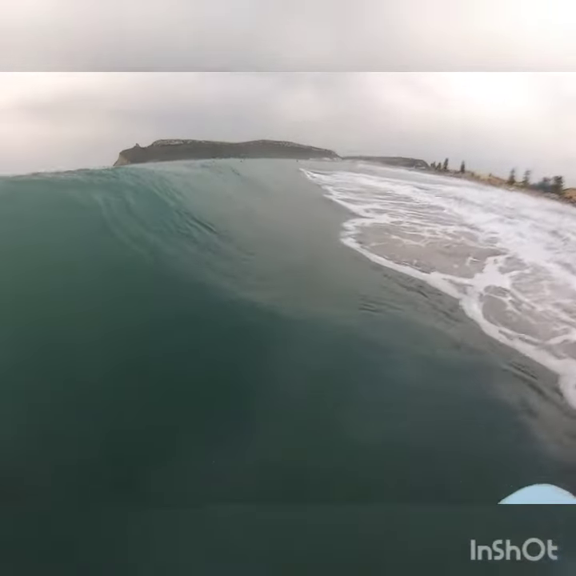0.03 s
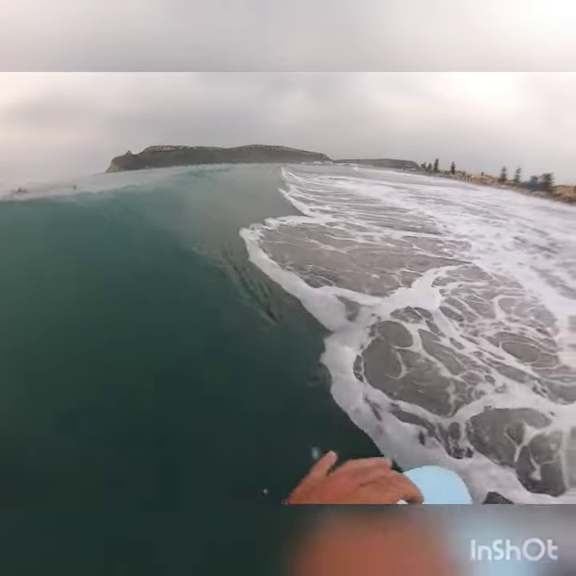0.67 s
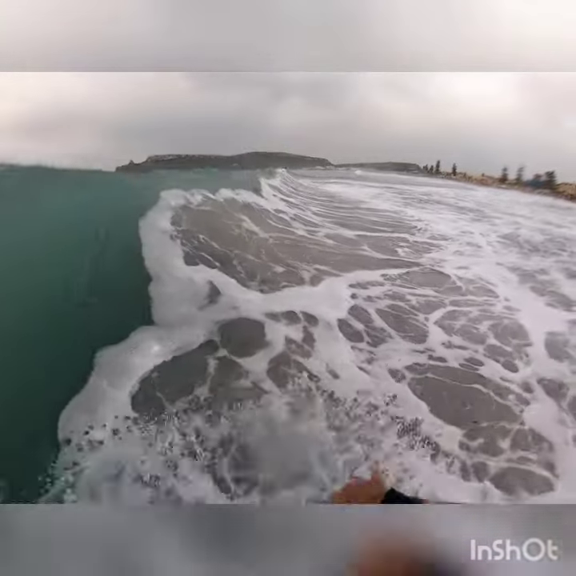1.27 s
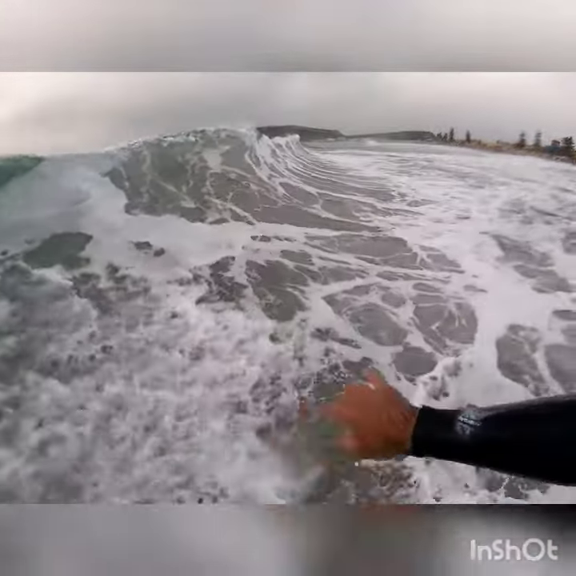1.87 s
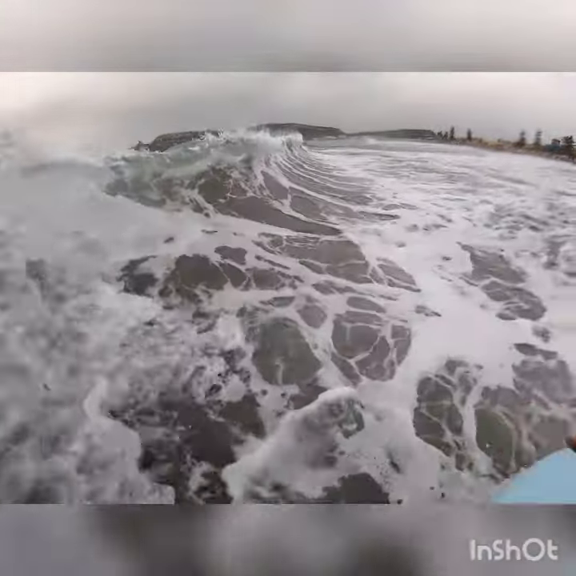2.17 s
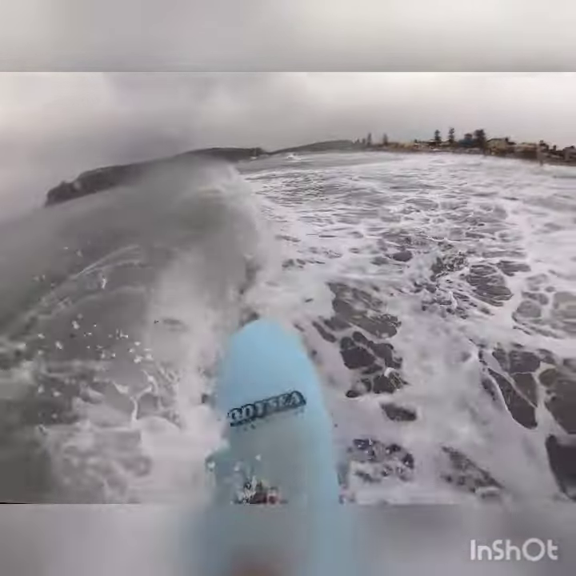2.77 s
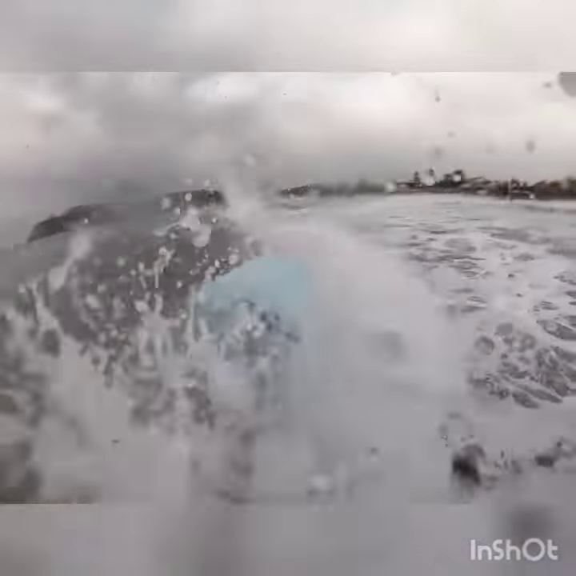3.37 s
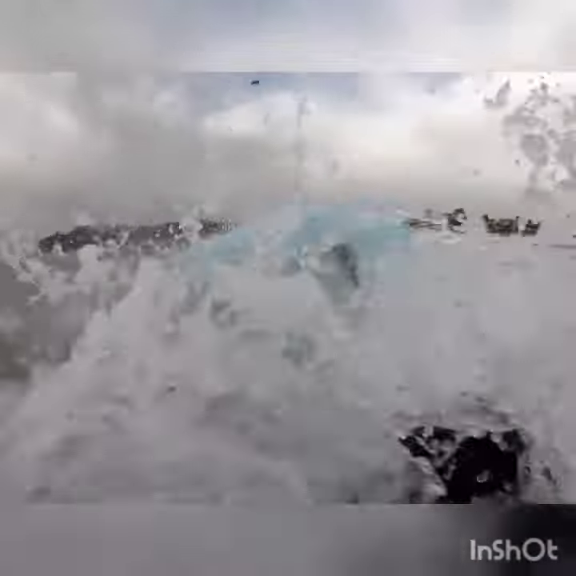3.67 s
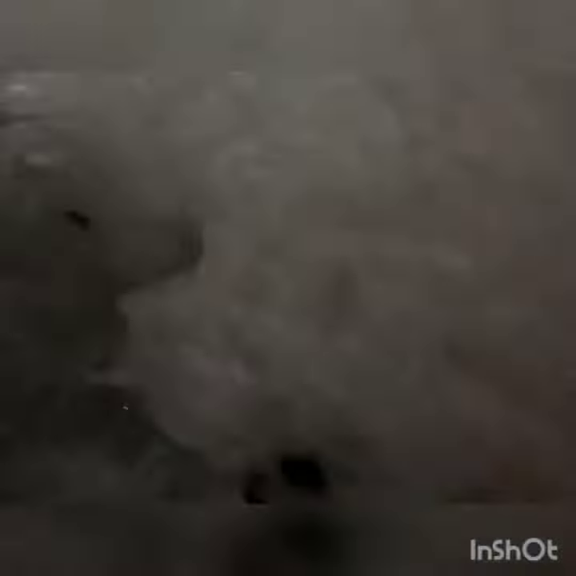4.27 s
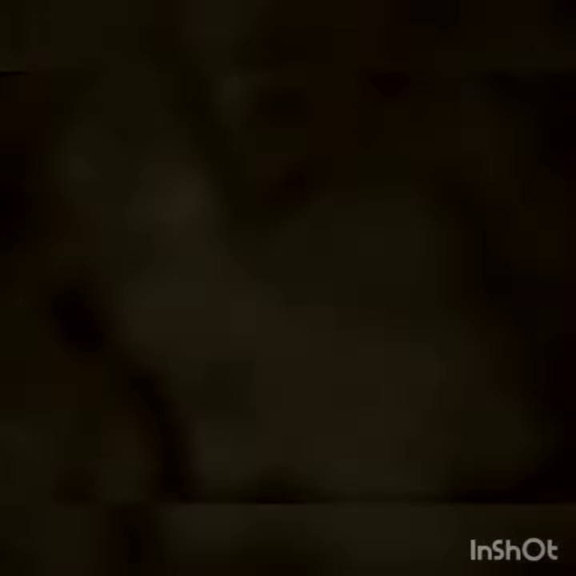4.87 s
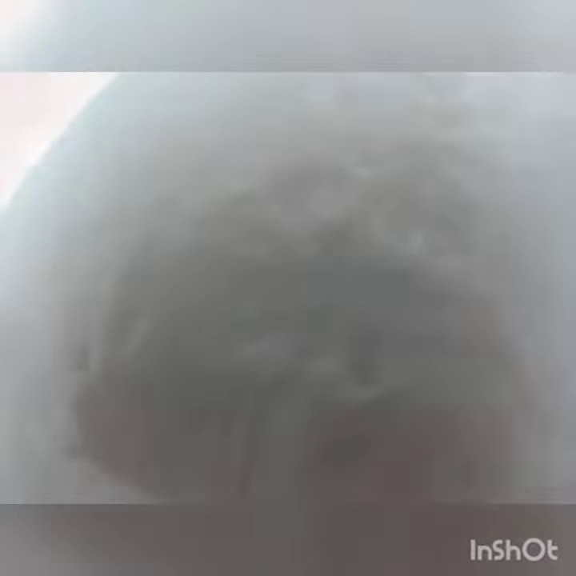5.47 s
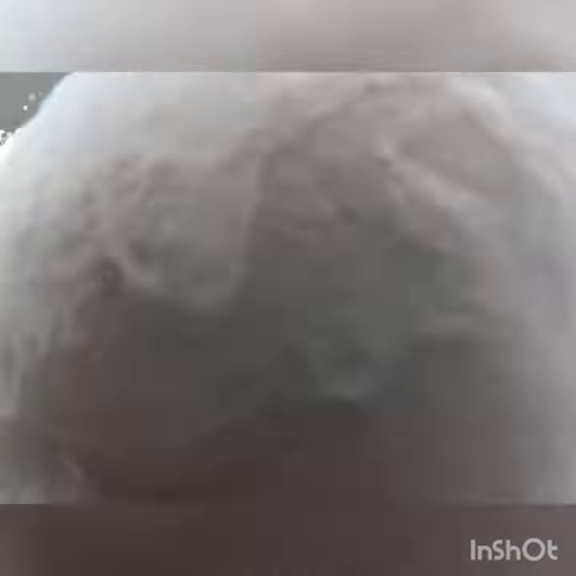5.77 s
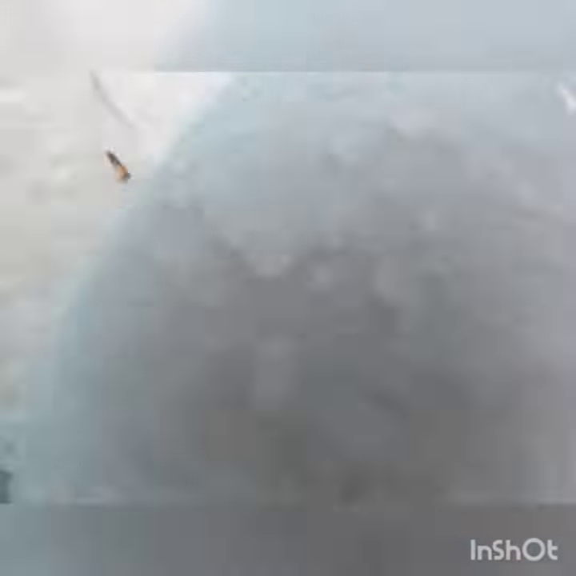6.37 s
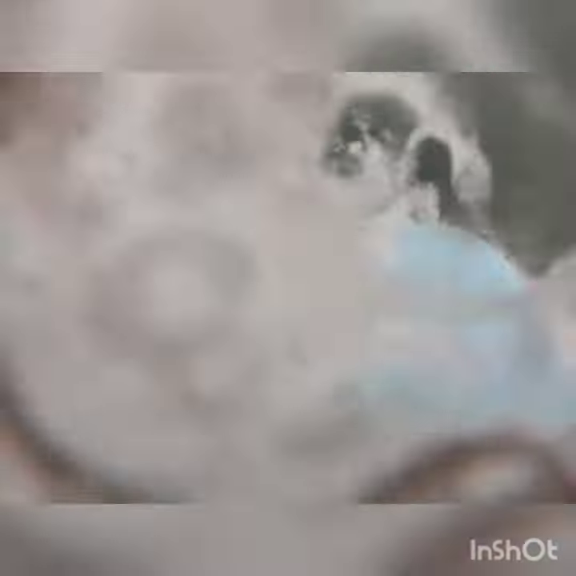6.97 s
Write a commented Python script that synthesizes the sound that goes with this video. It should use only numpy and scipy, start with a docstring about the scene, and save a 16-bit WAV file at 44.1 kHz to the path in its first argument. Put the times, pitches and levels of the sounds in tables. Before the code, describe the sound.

From the start, low wind buffets a waterproof camera housing, with a faint hollow hum, the muffled wash of a surfboard and the roar and soft hiss of a breaking wave. A thud and a wet slap land at about 0.4 seconds. The wash thickens from 1.5 seconds, with gusts, gulps and more slaps, strongest around 2.5 to 2.8.

From about 4.1 seconds big air pockets boom, and at 4.5 the wave closes overhead in a loud, deep, rumbling churn of bubbles with dry crackles. At 5.2 the sound drops out for an instant.

The housing then floats in brighter surges of sloshing, gurgling, fizzing foam, the biggest near 6.4 seconds. The board knocks dully against it at about 5.6, 6.4 and 7.2, while sharp slaps, spatters and small plinking drops strike close by until the end, just after 7 seconds.

```python
"""In the surf, heard from inside a waterproof housing: a surfer rides a breaking wave and falls. Wind buffets
the housing and makes it hum, the board throws a muffled wash, and drops slap and tick. The wave closes
overhead; big air pockets boom in a rumbling, crackling churn of bubbles. After a brief silence the scene
changes: the housing floats beside the knocking board in sloshing, gurgling foam."""
import sys
import numpy as np
from scipy import signal
from scipy.fft import rfft, irfft, next_fast_len
from scipy.io import wavfile
from scipy.ndimage import uniform_filter1d, minimum_filter1d, map_coordinates

SR = 44100
rng = np.random.default_rng(int(sys.argv[2]) if len(sys.argv) > 2 else 0)


def file_out(sig):
    """Save sig as 16-bit WAV at sys.argv[1]."""
    # one column per channel
    cols = np.atleast_2d(sig).T
    # limit, then scale
    lim = np.clip(cols, -1, 1)
    pcm = np.round(lim * 32767).astype(np.int16)
    wavfile.write(sys.argv[1], SR, pcm)


N = 317961
TIME = np.arange(N) / SR
PLUNGE_S, SILENCE_S, AFLOAT_S = 4.525, 5.196, 5.244  # the wave closes; the sound drops out; the next scene begins


# strength of the breaking water round the board: (time [s], level [dB])
SURF_STRENGTH = [(0, 2.5), (.42, -0.5), (.65, -4.5), (1.1, -2.5), (1.42, 2.5), (1.8, -1), (1.95, 5),
                 (2.12, 3.5), (2.4, -2), (2.49, 4.5), (2.85, 2.5), (3.05, 1), (3.64, 1), (3.75, -3.5),
                 (4.36, -1.5), (4.5, 2.5)]
# how deep the housing sits in the white water: (time [s], depth [0-1])
IMMERSION = [(0, 0.06), (1.4, 0.29), (2.8, 0.53), (3.1, 0.86), (3.9, 1)]
def riding(base_db, surf_share, sunk_db):
    """A layer's gain on the ride: it swells with the surf and shifts by sunk_db at full depth."""
    surf_db, depth = curves(SURF_STRENGTH)[0], curves(IMMERSION)[0]
    return amp(base_db + surf_share * surf_db + sunk_db * depth)


# muffled body of the wash: (frequency [Hz], level [dB])
WASH_EQ = [(70, -28.5), (150, -8), (220, -2.5), (340, -3), (450, -4), (540, -13.5), (700, -21),
           (1200, -45.5), (3000, -82.5)]
def board_wash():
    """The board throws a bubbling wash that grows as the housing sinks into it."""
    swarm = bubbles(WASH_EQ, per_s=300, hz=295.9, cycles=10.08, spread_db=3.5, noise_db=-1.5)
    return riding(-30, surf_share=0.843, sunk_db=9.85) * flutter(depth_db=1.74) * swarm


# midrange roar of the lip: (frequency [Hz], level [dB])
LIP_EQ = [(400, -10.5), (600, 3.5), (720, 1), (880, -1.5), (1000, -6), (1200, -12.5), (2000, -40),
          (4000, -66)]
# hiss of the foam: (frequency [Hz], level [dB])
HISS_EQ = [(700, -17.5), (1350, -0.5), (1650, -4.5), (2250, -5), (2800, -12), (3100, -16.5), (3500, -16.5),
           (3950, -25), (4400, -29.5), (5200, -48.5), (15000, -53.5)]
def breaking_wave():
    """The lip breaks and its foam hisses; depth smothers the hiss."""
    lip = flutter(depth_db=1.76) * patchy(turbulence(LIP_EQ, lumps_db=1.1, per_s=94), depth_db=1.5)
    hiss = patchy(turbulence(HISS_EQ, lumps_db=1.0, per_s=83), depth_db=1.53)
    hiss *= flutter(depth_db=0.5, per_s=28)
    return (riding(-37.5, surf_share=1.15, sunk_db=-0.6) * lip
            + riding(-47, surf_share=0.94, sunk_db=-6) * hiss)


# low end of the shifting pressure: (frequency [Hz], level [dB])
RUMBLE_EQ = [(12, -22), (30, -4.5), (75, 0), (150, -4), (210, -18), (500, -57.5)]
# body of the large bubbles: (frequency [Hz], level [dB])
CHURN_EQ = [(90, -21), (170, 3.5), (250, -4), (340, -1), (480, -7), (650, -13.5), (1000, -25),
            (2500, -81.5)]
# dulled top of the small bubbles: (frequency [Hz], level [dB])
DEEP_FIZZ_EQ = [(400, -10), (750, -1.5), (1100, -7), (1700, -13.5), (2500, -22), (3500, -30), (5000, -39.5),
                (6200, -59.5), (12000, -75.5)]
def underwater():
    """White water tumbles the housing: pressure rumbles, large bubbles churn, small ones fizz."""
    rumble = flutter(depth_db=1.5) * turbulence(RUMBLE_EQ, lumps_db=5.0, per_s=27)
    rumble *= plunge(-15, boost_db=3.5, rise_s=1, settle_s=0.1)
    churn = bubbles(CHURN_EQ, per_s=220, hz=311.4, cycles=8.2, spread_db=4.0, noise_db=0.5)
    churn *= plunge(-20, boost_db=7, rise_s=7.5, settle_s=0.36)
    fizz = plunge(-40.5, boost_db=15.5, rise_s=1, settle_s=0.15) * flutter(depth_db=2.0, per_s=62)
    fizz *= bubbles(DEEP_FIZZ_EQ, per_s=420, hz=1294, cycles=2.2, spread_db=3.0, noise_db=-1.5)
    arriving = amp(-69 * np.maximum(4.555 - TIME, 0))  # small bubbles reach the housing
    clearing = amp(-135 * np.maximum(TIME - 5.136, 0))  # the bubbles clear away
    return rumble + clearing * (churn + arriving * fizz)


def plunge(base_db, boost_db, rise_s, settle_s):
    """The gain of a layer that peaks as the wave closes, then settles."""
    before, after = np.minimum(TIME - PLUNGE_S, 0), np.maximum(TIME - PLUNGE_S, 0)
    return amp(base_db + boost_db / (1 + (before / rise_s) ** 2 + (after / settle_s) ** 2))


# booms of trapped air: (time [s], level [dB], mid pitch [Hz], length [s], glide [octaves])
AIR_POCKETS = [(3.16, -15.5, 212.6, 0.12, .1), (3.662, -18, 291, 0.13, -0.23),
               (4.162, -8, 112.7, 0.082, -0.78), (4.195, -8.5, 149.7, 0.13, 0.39),
               (4.257, -6.5, 101.2, 0.118, -0.61), (4.31, -9, 147.8, 0.11, 0.42),
               (4.36, -6.5, 122.6, 0.103, -0.34), (4.39, -8.5, 82.4, 0.13, -0.43),
               (4.445, -9.5, 148.2, 0.073, -0.034), (4.466, -11, 339.4, 0.099, -.25),
               (4.493, -5.5, 68, 0.079, -0.076), (4.545, -6, 134, 0.0657, -0.37),
               (4.642, -11, 101.6, 0.11, 0.84), (4.703, -7, 83.4, 0.082, 0.48),
               (4.743, -5.5, 119.3, 0.088, -1.7), (4.841, -19, 306.6, 0.154, 0.28),
               (4.955, -14.5, 111, 0.055, -0.94), (5.009, -8, 101, 0.088, -0.45),
               (5.09, -11, 160, 0.093, 0.24), (5.135, -13, 76.2, 0.072, -.8)]
def air_pockets():
    """Big air pockets swell and boom, gliding in pitch as they stretch or shrink."""
    track = np.zeros(N)
    for s, db, hz, length, glide in AIR_POCKETS:
        life = np.arange(int(length * SR)) / SR / length
        phase = 2 * np.pi * np.cumsum(hz * 2 ** (glide * (life - .5))) / SR
        add(track, s, amp(db) * np.sin(np.pi * life) ** 2 * np.sin(phase))
    return track


# weight of the slosh: (frequency [Hz], level [dB])
SLOSH_EQ = [(12, -26.5), (35, 6.5), (100, -2), (180, 0.5), (280, -7.5), (400, -21), (900, -62.5)]
# throat of the gurgle: (frequency [Hz], level [dB])
GURGLE_EQ = [(180, -35), (340, 0), (420, 3), (550, 1.5), (680, -2), (900, -25.5), (2000, -44)]
# mids of the froth: (frequency [Hz], level [dB])
FROTH_EQ = [(450, -17), (780, -3.5), (1000, -2.5), (1300, -6), (1750, -10.5), (2200, -17), (3000, -25),
            (5000, -63.5)]
# sparkle of the finest bubbles: (frequency [Hz], level [dB])
FIZZ_EQ = [(1500, -27), (2800, 0.5), (3700, -5), (4800, -5.5), (6200, -12), (7700, -12), (9700, -21.5),
           (11000, -43), (15000, -62.5)]
# surges at the surface: (crest time [s], build [s], slosh [dB], gurgle [dB], foam [dB])
SURGES = [(5.25, 0.119, -24, -26.5, -35.5), (5.33, 0.077, -29, -26, -29), (5.47, 0.2, -28.5, -26, -30),
          (5.55, 0.15, -28.5, -24.5, -31.5), (5.76, 0.33, -21, -28, -30), (5.88, 0.142, -20.5, -22, -28),
          (6.02, 0.138, -28, -22, -26), (6.38, 0.29, -15.5, -19, -22.5), (6.84, 0.35, -20.5, -24, -25),
          (7.0, 0.29, -22.5, -23.5, -25), (7.159, 0.27, -22.5, -26, -29)]
def afloat():
    """Broken water surges round the floating housing, the heavy slosh lagging behind the foam."""
    slosh_db, gurgle_db, foam_db = np.transpose(SURGES)[2:]
    slosh = surging(slosh_db, build_db=5.5, collapse_db_per_s=77, lag_s=0.04)
    slosh *= flutter(depth_db=2.0) * turbulence(SLOSH_EQ, lumps_db=2.5, per_s=42)
    gurgle = surging(gurgle_db, build_db=3.5)
    gurgle *= bubbles(GURGLE_EQ, per_s=450, hz=500.3, cycles=12.5, spread_db=3, noise_db=-3.0)
    froth = bubbles(FROTH_EQ, per_s=800, hz=1192, cycles=16.4, spread_db=3.0, noise_db=-6.0)
    fizz = bubbles(FIZZ_EQ, per_s=1200, hz=4110, cycles=9.5, spread_db=3.5, noise_db=-1.5)
    fizz *= amp(-32 + 3 * (TIME - AFLOAT_S))  # thickens as the foam breaks up
    foam = surging(foam_db, build_db=7.5) * (froth + fizz)
    return slosh + gurgle + patchy(foam, depth_db=1.27)


def surging(crests_db, build_db, collapse_db_per_s=134.5, lag_s=0):
    """The gain of a layer that builds steadily to the crest of each surge, then collapses."""
    levels = []
    for (s, build_s, *_), db in zip(SURGES, crests_db):
        age = TIME - s - lag_s
        levels.append(db - np.maximum(-build_db * age / build_s, collapse_db_per_s * age))
    return amp(np.max(levels, axis=0))


# wet slaps: (time [s], level [dB], cavity pitch [Hz], 60 dB decay [s])
WATER_SLAPS = [(.4205, -3, 438, 0.023), (.994, -14, 586, 0.019), (1.412, -9.5, 537, 0.024),
               (1.94, -10.5, 740, 0.02), (2.484, -11.5, 658, 0.025), (2.509, -6.5, 786, 0.0078),
               (2.5095, -9.5, 1770, 0.006), (2.511, 2.5, 398, 0.0182), (2.556, -3, 404, 0.031),
               (2.5595, -11, 1070, 0.0095), (2.742, -16.5, 690, 0.0125), (2.786, -1, 548, 0.019),
               (2.7885, -19, 1392, 0.0044), (2.99, -10.5, 558, 0.024), (3.154, -15.5, 937, 0.015),
               (3.2125, -24.5, 1922, .005), (3.321, -4, 687, 0.011), (3.3225, -17, 1340, 0.0038),
               (3.523, -16, 811, 0.0085), (3.6342, -18.5, 990, 0.017), (3.6605, -14.5, 1080, 0.01),
               (3.673, -19.5, 1000, .024), (4.554, -9, 970, .013), (4.96, -11.5, 790, 0.014),
               (5.308, -17, 845, 0.035), (5.619, -3, 976, 0.0131), (5.627, -10.5, 1196, 0.013),
               (5.903, -13, 1080, 0.051), (6.229, -13.5, 1330, 0.0099), (6.244, -8, 1110, .014),
               (6.33, -5, 1005, 0.014), (6.361, -10, 883, 0.011), (6.396, -12, 970, 0.0134),
               (6.418, 0.5, 880, 0.016), (6.458, 0.5, 1033, 0.014), (6.603, -1.5, 558, 0.017),
               (6.8635, -1.5, 577, 0.015), (6.865, -7.5, 1246, 0.008), (6.9145, 2.5, 1110, 0.0046),
               (7.014, 5, 1340, 0.0037), (7.1618, 1, 1630, 0.0051), (7.1632, -1, 840, 0.015),
               (7.19, -4, 1092, 0.013)]
def water_slaps():
    """Water slaps the housing and traps air that rings upward."""
    return hits(WATER_SLAPS, splat_db=-19, rise=0.15, attack_cycles=0.57, muffle_hz=2620)


# dull thuds: (time [s], level [dB], pitch [Hz], 60 dB decay [s])
BOARD_KNOCKS = [(.396, -3.5, 96, 0.0302), (5.623, -1.5, 135, 0.028), (6.398, -3.5, 240, 0.023),
                (6.458, -4, 147.5, 0.044), (7.163, -2.5, 150, 0.037), (7.195, -10, 119, 0.054)]
def board_knocks():
    """The board bumps the housing with a low, fast-edged knock."""
    return hits(BOARD_KNOCKS, splat_db=-5, rise=.03, attack_cycles=0.18, muffle_hz=690)


# hollow gulps: (time [s], level [dB], pitch [Hz], length [s])
GULPS = [(1.36, -27, 195, 0.146), (1.38, -25, 344, 0.13), (1.867, -28.5, 588, 0.22),
         (2.435, -20, 560, 0.11), (2.571, -26.5, 390, 0.32), (2.711, -21.5, 309.4, 0.097),
         (3.329, -21.5, 389, 0.22), (3.685, -18.5, 240, 0.24), (4.494, -13.5, 374, 0.085),
         (4.665, -13, 250, 0.15), (5.068, -18.5, 334, 0.081), (5.627, -34, 467, 0.055),
         (6.582, -22.5, 489, 0.128), (6.773, -22, 510, 0.11), (6.939, -22.5, 523, 0.079)]
def gulps(width=0.23):
    """Water wells against the housing; each gulp is a brief swell of one hollow resonance."""
    track, t = np.zeros(N), np.arange(SR // 2) / SR
    for s, db, hz, length in GULPS:
        hollow = steady(bandpass(rng.standard_normal(len(t)), hz, width))
        swell = np.sin(np.pi * np.minimum(t / length, 1)) ** 2
        add(track, s, amp(db) * swell * hollow)
    return track


# bass of the wind: (frequency [Hz], level [dB])
WIND_EQ = [(12, -8.5), (28, -6.5), (55, -2.5), (110, -5), (170, -9.5), (260, -21.5), (600, -68.5)]
# gusts: (time [s], boost [dB])
GUSTS = [(.3, 3), (2.08, 5), (2.6, 5.5), (3.199, 3.5), (3.92, 5.5)]
def wind(gust_half_width_s=0.05):
    """Eddies of wind buffet the housing, punching up in short gusts."""
    gust_db = sum(db * np.exp(-((TIME - s) / gust_half_width_s) ** 2) for s, db in GUSTS)
    buffet = turbulence(WIND_EQ, lumps_db=2.5, per_s=13)
    return riding(-24.5, surf_share=0.15, sunk_db=6.65) * amp(gust_db) * buffet


# the housing's hollow note: (time [s], level [dB], pitch [Hz])
HOUSING_NOTE = [(0, -29.5, 569.7), (.38, -29, 594), (.68, -37.5, 575), (.85, -34.5, 562), (.88, -28, 558),
                (.99, -29, 579.5), (1.06, -32.5, 569.5), (1.55, -28.5, 546), (1.63, -24, 490),
                (1.78, -35.5, 520), (1.98, -31, 574.8), (2.9, -30.5, 560), (4.2, -38.5, 510)]
def housing_hum():
    """The housing's resonance swells as water passes and sags under its load."""
    db, hz = curves(HOUSING_NOTE)
    return amp(db) * cavity(hz, width_hz=58)


# bright plinks: (time [s], level [dB], pitch [Hz], 60 dB decay [s])
DROPLETS = [(3.5888, -29.5, 3430, 0.0072), (3.6597, -15, 2000, 0.0073), (3.66, -49, 4130, 0.053),
            (6.4373, -22, 2750, 0.0048), (6.44, -32, 4730, 0.0072), (6.458, -18.5, 2190, 0.0094),
            (6.8972, -12, 1700, 0.013), (6.9148, -16.5, 2370, 0.0056), (6.9235, -8, 1750, 0.011),
            (6.992, -22, 2170, 0.0073), (7.011, -17.5, 2920, 0.0047)]
def droplets():
    """Droplets and single bursting bubbles ring with a small upward chirp."""
    return hits(DROPLETS, splat_db=-12.5, rise=0.095, attack_cycles=1.0, muffle_hz=4570)


# underwater crackles: (time [s], level [dB])
CRACKLES = [(4.479, -11), (4.537, -6), (4.551, -8), (4.605, 3), (4.7676, -3), (4.774, -5.5), (4.785, -5.5),
            (4.791, -6.5), (4.883, -9.5), (4.978, -14), (5.019, -13), (5.107, -7.5), (5.122, -11)]
def crackles(hz=1180, t60_s=0.002):
    """Dry clicks cut through the churn, each dying within a few cycles."""
    rows = [(s, db, hz, t60_s) for s, db in CRACKLES]
    return hits(rows, splat_db=-9.5, rise=.1, attack_cycles=0.63, muffle_hz=3300)


# ticks of hard drops: (time [s], level [dB])
DROP_TICKS = [(6.3321, -14), (6.421, -14), (6.4239, -19), (6.899, -24), (6.915, -16), (6.923, -16),
              (6.956, -15), (6.9754, -10), (6.9925, -25), (7.0135, -21), (7.1625, -25), (7.1903, -18)]
def drop_ticks(hz=1700, t60_s=0.0014, muffle_hz=5200):
    """A hard drop strikes the housing and rings it for only a cycle or two."""
    track, t = np.zeros(N), np.arange(SR // 50) / SR
    for s, db in DROP_TICKS:
        add(track, s, amp(db - 60 * t / t60_s) * np.sin(2 * np.pi * hz * t))
    return signal.sosfilt(signal.butter(4, muffle_hz, fs=SR, output="sos"), track)


# showers of spray and bubbles: (time [s], level [dB], band centre [Hz], length [s])
SPATTERS = [(1.898, -40, 850, 0.046), (2.15, -32, 950, 0.015), (2.333, -38, 1100, 0.027),
            (2.466, -41, 2000, 0.034), (2.476, -31, 620, 0.06), (2.577, -41, 950, 0.038),
            (3.589, -31, 950, 0.028), (3.597, -49, 2600, 0.019), (3.658, -37.5, 1900, 0.028),
            (4.549, -28, 1410, 0.058), (4.578, -29.5, 1150, 0.055), (4.76, -40.5, 1000, 0.029),
            (4.874, -35.5, 1200, 0.018), (4.959, -39.5, 1500, 0.014), (5.015, -34, 1000, .035),
            (5.082, -37, 1150, 0.058), (5.418, -40.5, 1860, 0.025), (5.658, -41.5, 1800, 0.12),
            (5.743, -27.5, 1190, 0.026), (5.82, -37.5, 1750, 0.031), (5.994, -33, 1150, .055),
            (6.1, -25, 920, .06), (6.24, -24, 1050, 0.11), (6.76, -28.5, 1250, 0.12),
            (6.951, -32, 1525, 0.0256)]
def spatters(width=0.44, crackle_db=8):
    """A shower hits the housing as a quick swell of tiny impacts of very uneven size."""
    track = np.zeros(N)
    for s, db, hz, length in SPATTERS:
        t = np.arange(int(length * SR)) / SR
        impacts = rng.standard_normal(len(t)) * amp(crackle_db * rng.standard_normal(len(t)))
        swell = np.sin(np.pi * np.sqrt(t / length))
        add(track, s, amp(db) * swell * unit(bandpass(impacts, hz, width)))
    return track


# ring of the microphone port: (time [s], level [dB], pitch [Hz])
PORT_RING = [(.4, -60.5, 2730), (.7, -68, 2410), (1.3, -51.5, 2250), (1.7, -58.5, 2260), (2.2, -55.5, 2380),
             (2.9, -59, 2490), (3.05, -69.5, 2110), (4.4, -60, 1940)]
# sheets of spray thrown over the housing: (time [s], level [dB])
SPRAY_SHEETS = [(.1, -88.5), (.95, -78.5), (1.45, -78), (2.5, -72), (2.85, -78), (3.35, -67),
                (3.699, -70.5), (4.201, -76.5)]
# high resonances of the housing: (frequency [Hz], level [dB])
HOUSING_EQ = [(4500, -35), (6700, -12), (7800, -19), (8500, -11.5), (9000, 1.5), (9350, -12.5), (9750, 2.5),
              (10500, -17), (15500, -22)]
def spray(rise_db_per_s=130, drain_db_per_s=19.5, mist_db=-91.5):
    """Fine spray rings in the microphone port; each sheet adds a high sheen and drains off."""
    port_db, port_hz = curves(PORT_RING)
    port = amp(port_db) * cavity(port_hz, width_hz=320)
    power = amp(mist_db) ** 2
    for s, db in SPRAY_SHEETS:
        fade_db = np.maximum(rise_db_per_s * (s - TIME), drain_db_per_s * (TIME - s))
        power = power + amp(db - fade_db) ** 2
    return port + np.sqrt(power) * turbulence(HOUSING_EQ, lumps_db=2.5, per_s=170)


def bubbles(eq, per_s, hz, cycles, spread_db, noise_db, rise=0.148):
    """A swarm of rising rings scattered round hz, each 40 dB down after cycles, on a bed of noise."""
    count = int(per_s * N / SR)
    start = rng.integers(0, N, (count, 1))
    pitch = hz * np.exp(rng.normal(0, .45, (count, 1)))
    size = amp(spread_db * np.minimum(rng.exponential(1, (count, 1)), 4))
    samples = np.arange(int(2 * cycles * SR / hz))
    turns = pitch * samples / SR
    age = np.minimum(turns / cycles, 2)
    envelope = size * amp(-40 * age) * (1 - np.exp(-3 * turns))
    rings = envelope * np.sin(2 * np.pi * turns * (1 + rise * age)) * rng.choice([-1, 1], (count, 1))
    swarm = np.bincount((start + samples).ravel(), rings.ravel(), N)[:N]
    return steady(coloured(swarm, eq) + amp(noise_db) * coloured(rng.standard_normal(N), eq))


def hits(rows, splat_db, rise, attack_cycles, muffle_hz):
    """Each hit is a short noisy splat and a ring that bends upward, dulled by the housing."""
    track, t = np.zeros(N), np.arange(SR // 10) / SR
    for s, db, hz, t60 in rows:
        ring = np.sin(2 * np.pi * hz * t * (1 + rise * np.minimum(t / t60, 1)))
        splat = unit(bandpass(rng.standard_normal(len(t)), hz, width=1, order=2))
        envelope = amp(db - 60 * t / t60) * (1 - np.exp(-t * hz / attack_cycles))
        add(track, s, envelope * (ring + amp(splat_db) * splat))
    return signal.sosfilt(signal.butter(6, muffle_hz, fs=SR, output="sos"), track)


def turbulence(eq, lumps_db, per_s):
    """Noise that comes in eddies, about per_s a second."""
    return steady(coloured(rng.standard_normal(N) * flutter(lumps_db, per_s), eq))


def cavity(hz, width_hz):
    """A resonance blown by noise, its pitch free to move."""
    drift = lambda: filtered(rng.standard_normal(N), lambda f: 1 / (1 + (f / width_hz) ** 4))
    phase = 2 * np.pi * np.cumsum(hz) / SR
    return steady(drift() * np.cos(phase) + drift() * np.sin(phase))


def flutter(depth_db, per_s=14):
    """The gain of a flow that wavers smoothly at random."""
    knots = rng.standard_normal(int(N * per_s / SR) + 4)
    return amp(depth_db * map_coordinates(knots, [TIME * per_s]))


def patchy(x, depth_db):
    """Shifting water tints the sound in patches about 600 Hz wide and 45 ms long."""
    spectra = signal.stft(x, nperseg=512, noverlap=384)[2]
    across_pitch = uniform_filter1d(rng.standard_normal(spectra.shape), 7, axis=0)
    patches = unit(uniform_filter1d(across_pitch, 16, axis=1))
    return signal.istft(spectra * amp(depth_db * patches), nperseg=512, noverlap=384)[1][:N]


def amp(db):
    """Decibels to gain."""
    return 10 ** (np.asarray(db) / 20)


def unit(x):
    """Scale to rms 1."""
    return x / np.sqrt(np.mean(x ** 2) + 1e-20)


def steady(x):
    """Even out slow swells, so that the flow alone sets the level."""
    return x / np.sqrt(np.abs(uniform_filter1d(x ** 2, 2400)) + 1e-9)


def curves(rows):
    """One automation curve for each column after the time."""
    times, *columns = np.transpose(rows)
    return [np.interp(TIME, times, column) for column in columns]


def filtered(x, response):
    """Apply a gain that depends on frequency."""
    size = next_fast_len(N + SR // 2)
    return irfft(rfft(x, size) * response(np.fft.rfftfreq(size, 1 / SR)), size)[:N]


def coloured(x, eq):
    """Shape x with an EQ curve, at rms 1."""
    points_hz, db = np.transpose(eq)
    gain = lambda hz: amp(np.interp(np.log(hz + 1), np.log(points_hz), db, left=-120, right=-120))
    return unit(filtered(x, gain))


def bandpass(x, hz, width, order=4):
    """Keep the band within a factor of 1 + width of hz."""
    edges = [hz / (1 + width), hz * (1 + width)]
    return signal.sosfilt(signal.butter(order, edges, "band", fs=SR, output="sos"), x)


def add(track, s, sound):
    """Mix a sound into the track at time s."""
    part = track[round(s * SR):][:len(sound)]
    part += sound[:len(part)]


def scene():
    """The ride crossfades into the plunge, then the scene changes to the housing afloat; close hits play over
    both."""
    ride = wind() + board_wash() + housing_hum() + breaking_wave() + spray()
    crossfade = np.clip((TIME - 4.44) / 0.13, 0, 1) * np.pi / 2
    fall = np.cos(crossfade) * ride + np.sin(crossfade) * underwater() + air_pockets()
    impacts = water_slaps() + board_knocks() + droplets() + crackles() + spatters() + drop_ticks()
    water = np.where(TIME < SILENCE_S, fall, afloat())
    return (water + gulps() + impacts)[None]


def record(dry, ceiling=.92, smoothing=441, top_hz=15700):
    """A limiter eases the loudest peaks down; a brief mute comes before the floating; the top rolls off."""
    needed = ceiling / np.maximum(np.abs(dry[0]), ceiling)
    held = minimum_filter1d(needed, 2 * smoothing)
    gain = uniform_filter1d(uniform_filter1d(held, smoothing), smoothing)
    gate = uniform_filter1d(1. * ((TIME < SILENCE_S) | (TIME > AFLOAT_S)), size=16)
    return filtered(dry[0] * gain * gate, lambda hz: hz < top_hz)[None]


dry = scene()
out = record(dry)
file_out(out)
```